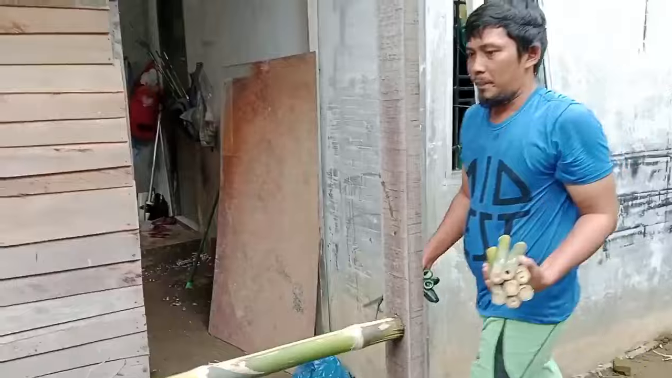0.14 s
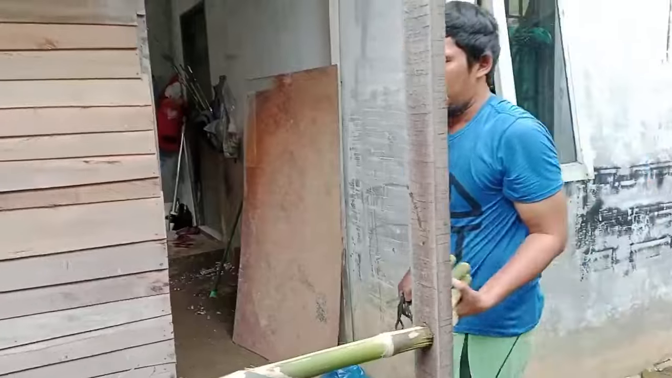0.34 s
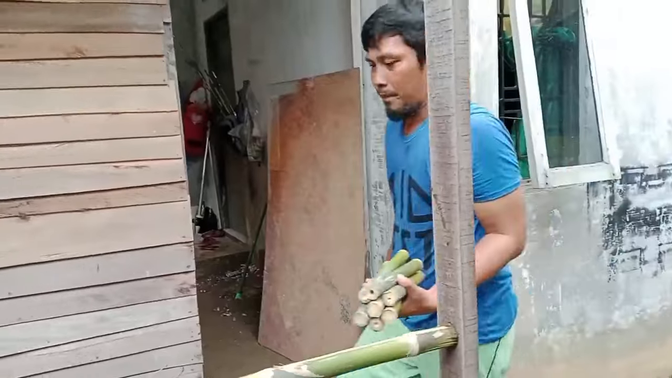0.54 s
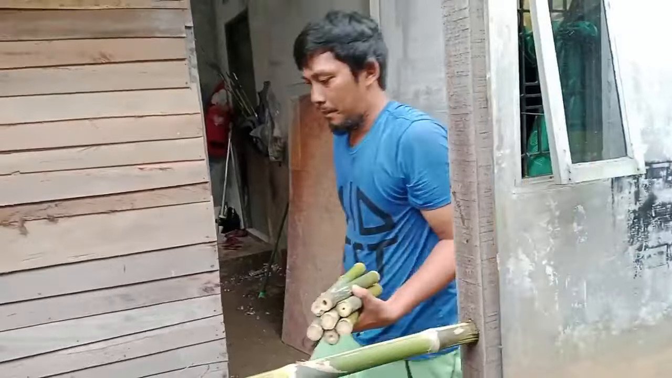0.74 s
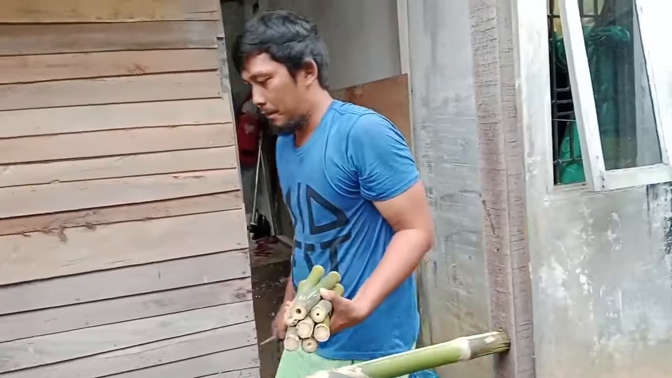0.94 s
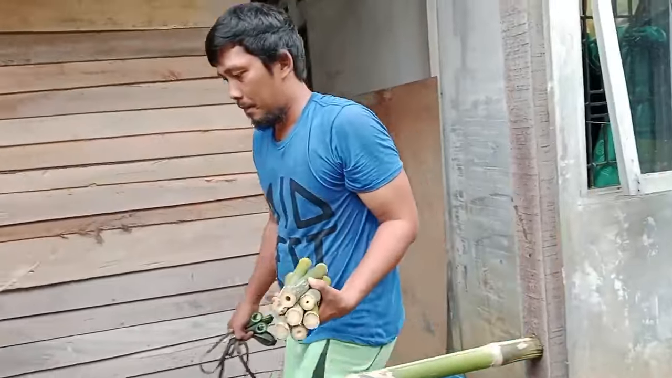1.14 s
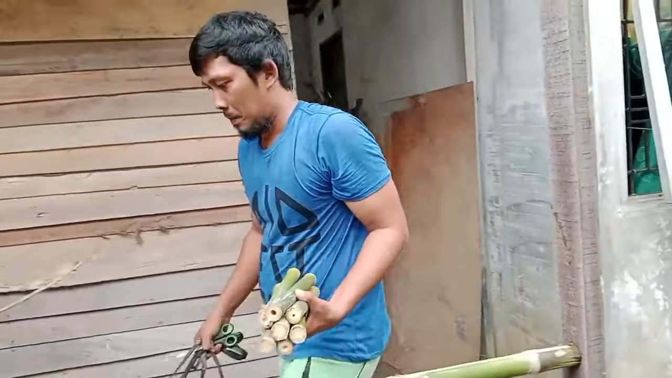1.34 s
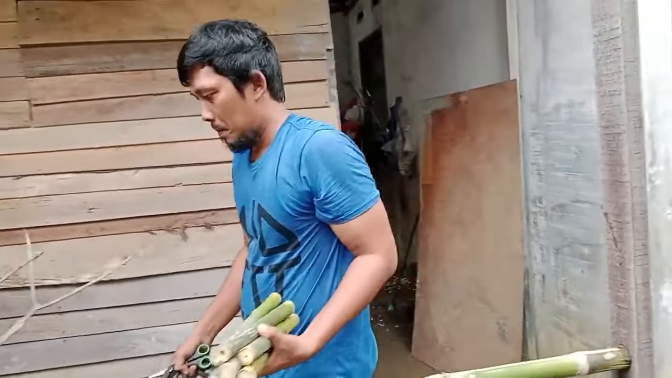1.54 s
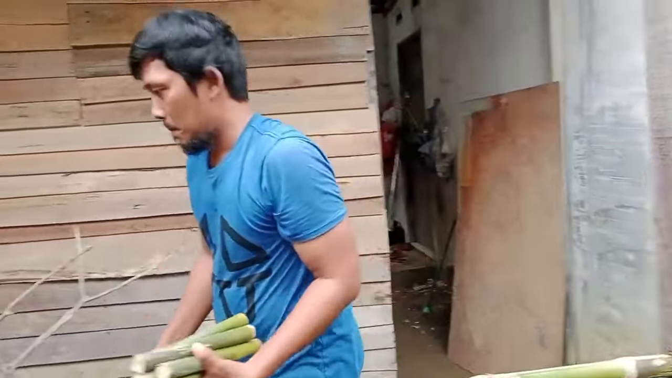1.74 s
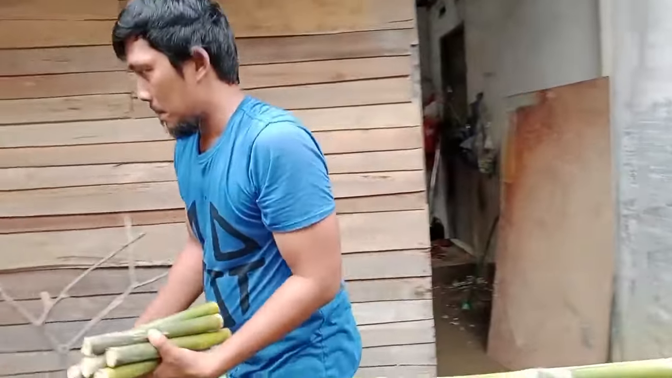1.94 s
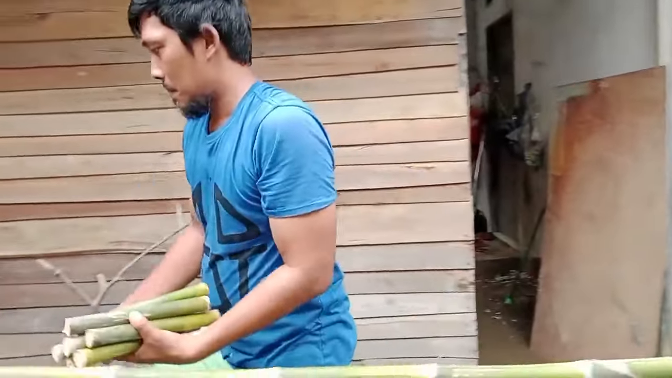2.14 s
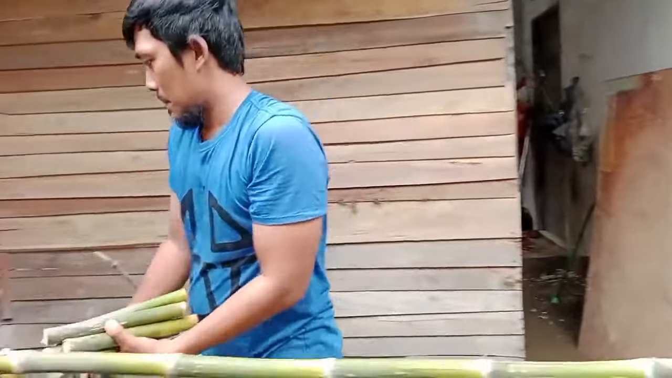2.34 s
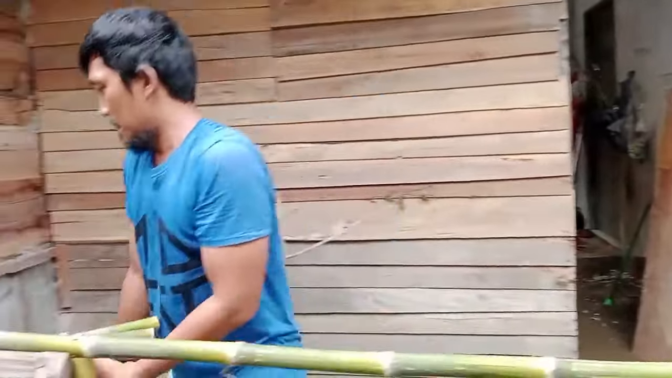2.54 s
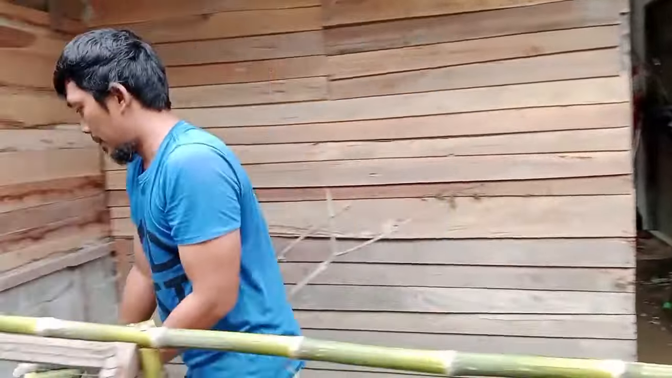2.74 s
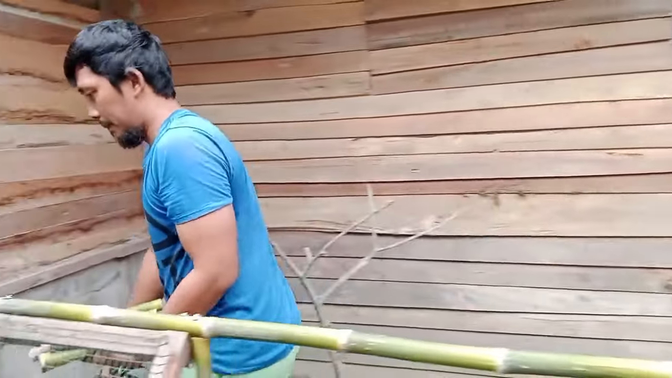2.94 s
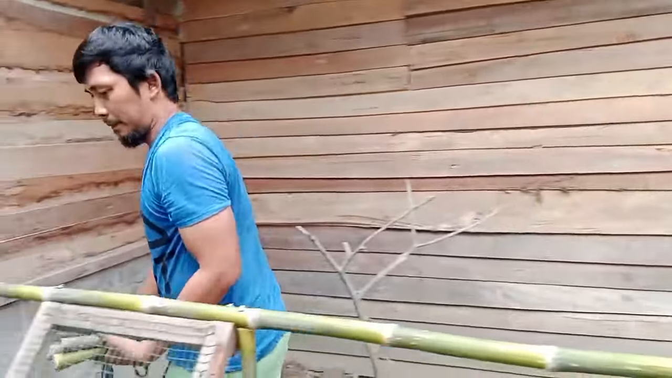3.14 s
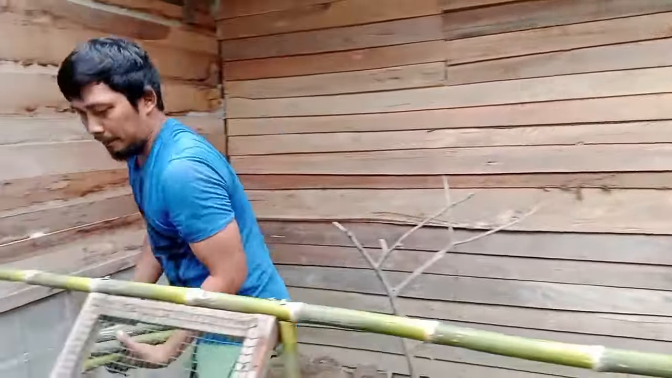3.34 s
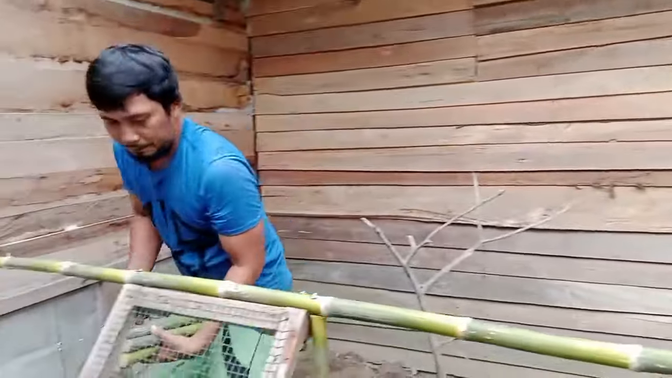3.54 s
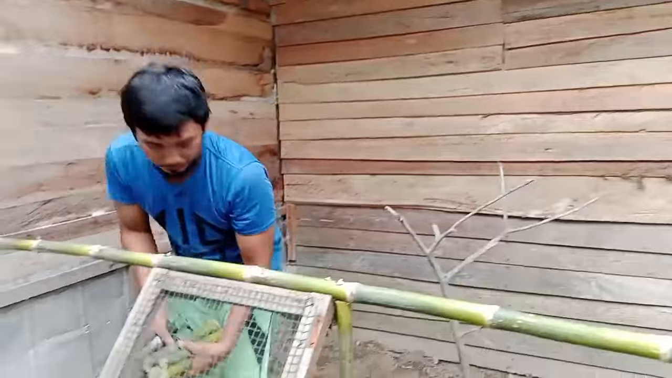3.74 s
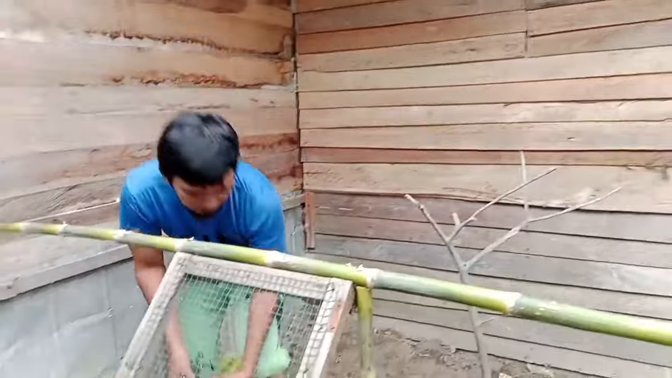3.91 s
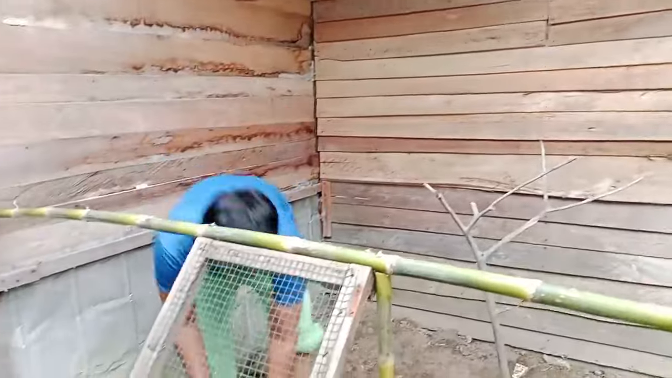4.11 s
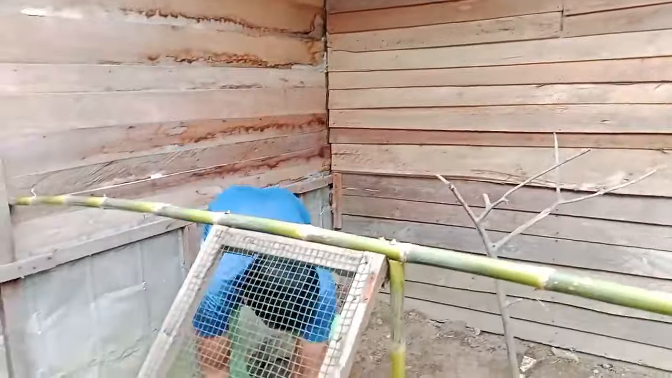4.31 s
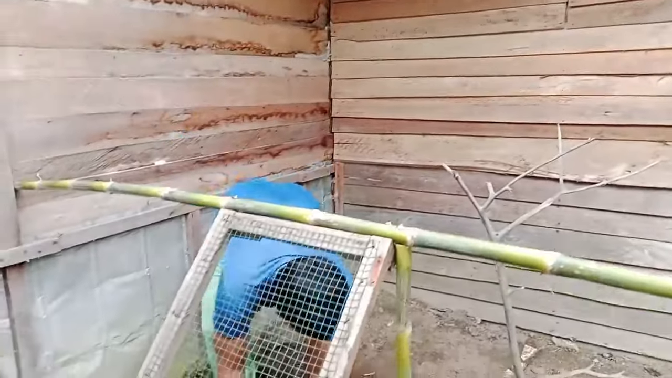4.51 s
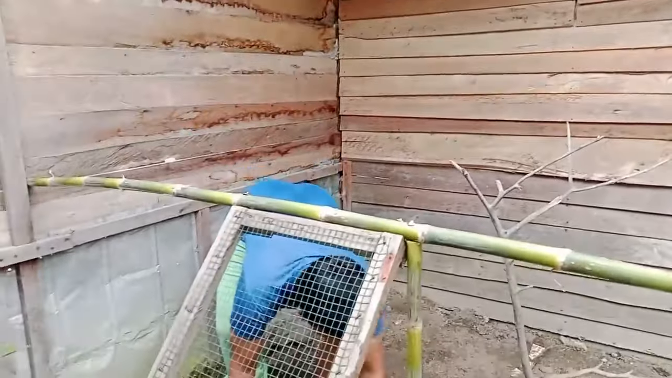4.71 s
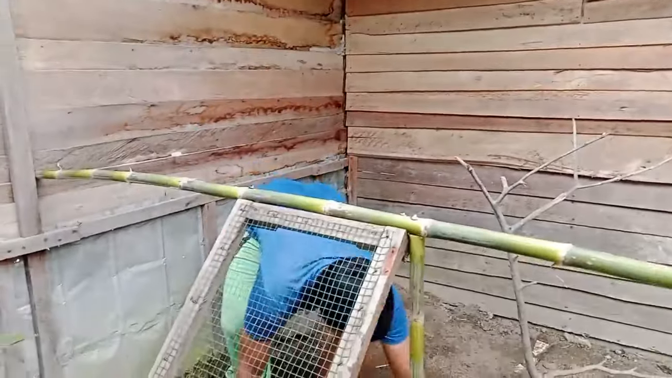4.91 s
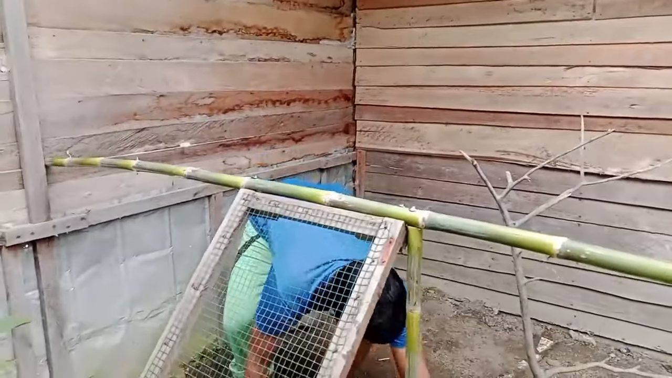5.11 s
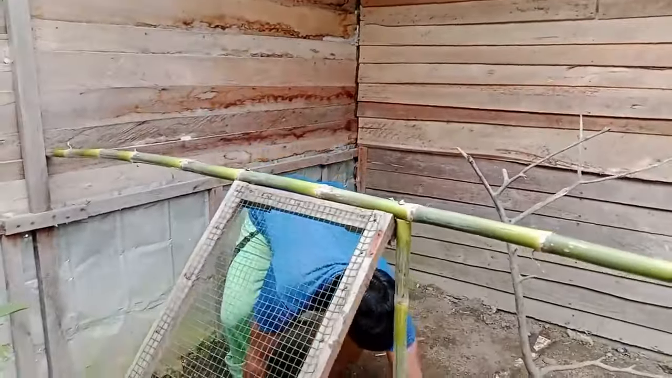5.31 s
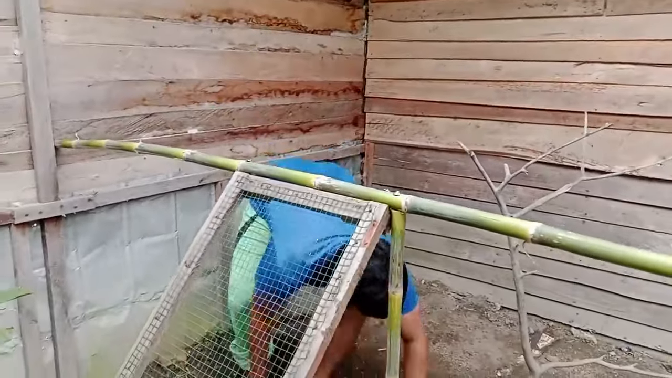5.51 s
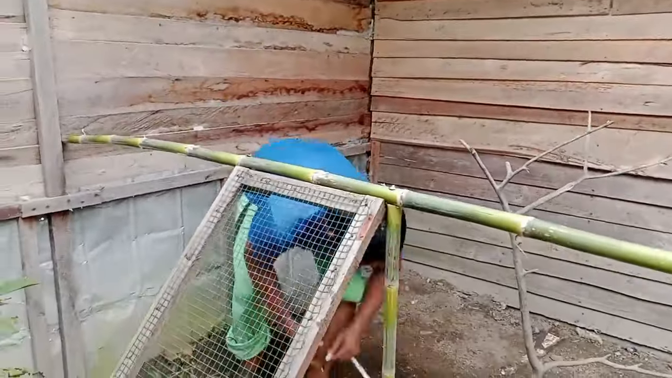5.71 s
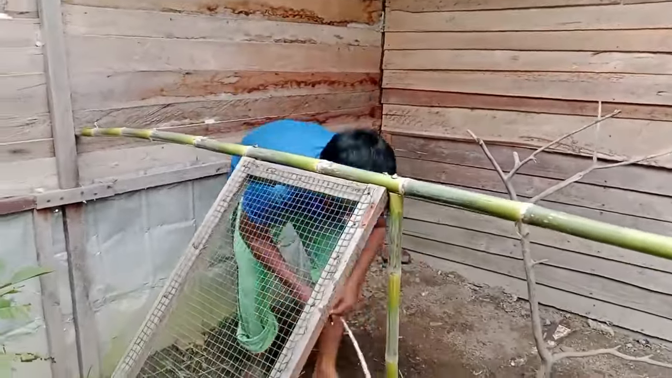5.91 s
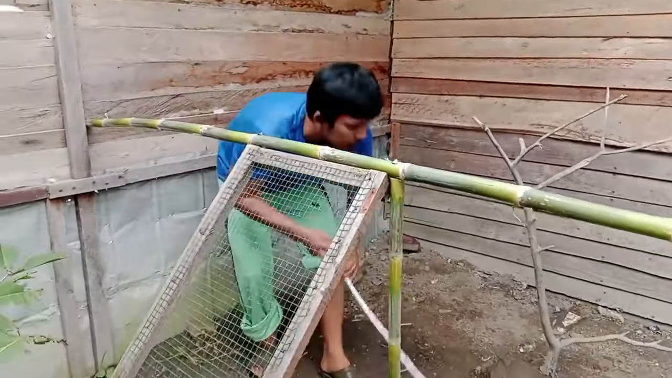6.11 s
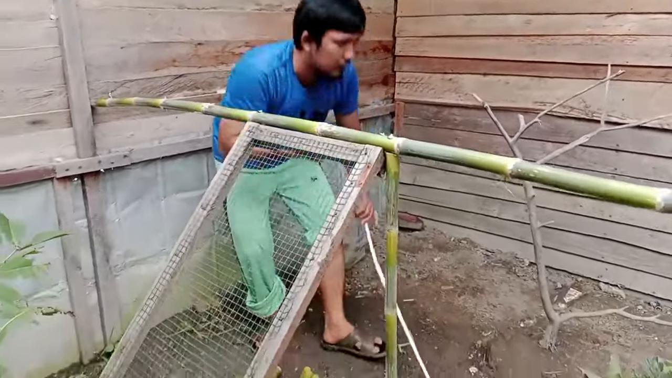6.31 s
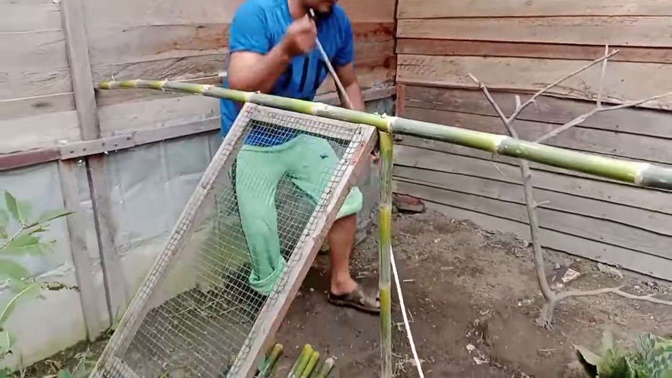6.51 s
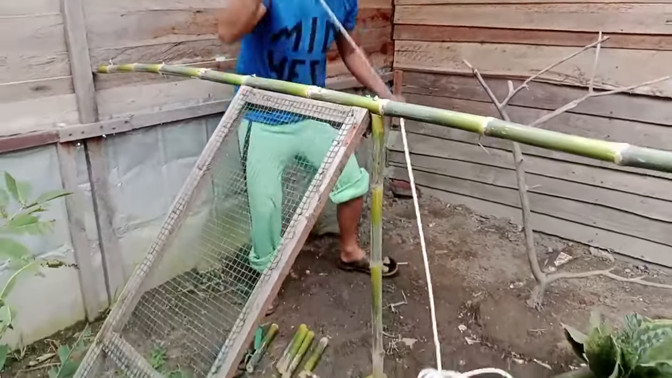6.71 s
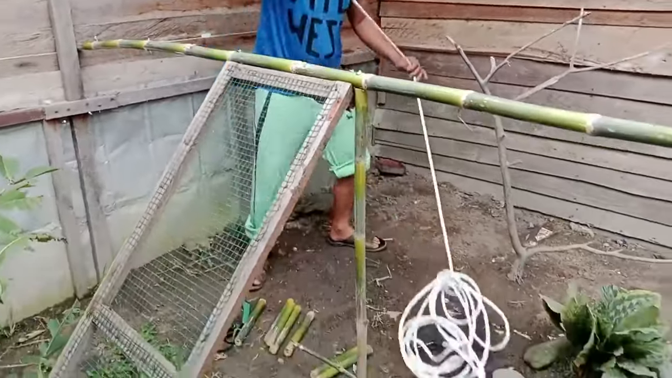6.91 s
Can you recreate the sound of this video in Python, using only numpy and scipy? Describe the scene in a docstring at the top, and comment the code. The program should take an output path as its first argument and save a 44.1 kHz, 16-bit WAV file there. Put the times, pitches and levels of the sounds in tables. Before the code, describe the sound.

Soft footsteps on gritty earth, then a bundle of bamboo sticks drops with a loud hollow clatter, followed by small knocks, scraping and rustling outdoors.

```python
"""A plank-walled yard: a man in sandals carries a bundle of short bamboo sticks across and drops it on the earth.
Knocks ring the bamboo modes and rubbing slips keep them sounding; bursts of grains crunch over fading thuds.
Feet, clothes and rope drag as swelling grainy noise, with fine dry ticks late on.
Insects and a far motor are narrow noise bands over a quiet outdoor floor; the walls return dull echoes."""
import sys
import numpy as np
from scipy import signal
from scipy.fft import rfft, irfft
from scipy.io import wavfile
from scipy.ndimage import uniform_filter1d, minimum_filter1d

SR = 44100
rng = np.random.default_rng(int(sys.argv[2]) if len(sys.argv) > 2 else 0)


def to_wav(sig):
    """Store sig (one row per channel, or 1-D mono) as 16-bit WAV at the path in sys.argv[1].

    Samples outside -1..1 are clipped; the rate is SR.
    """
    pcm = np.clip(np.atleast_2d(sig), -1, 1) * 32767
    pcm = np.round(pcm).astype(np.int16)
    wavfile.write(sys.argv[1], SR, pcm.T)  # frames by channels


N = 306568
T = np.arange(N) / SR
DECAY = np.log(1000)  # a fall of 60 dB

# modes of the freely ringing sticks: (frequency [Hz], level [dB], t60 [s])
BAMBOO = [(900, -18.5, 0.029), (1220, -12, 0.11), (1350, -5, 0.069), (1340, -10, 0.15), (1489, 0.5, 0.053),
          (1566, 0, .12), (1597.6, -1.5, 0.11), (1710, -9, 0.056), (1748, -2, 0.11), (1850, -2, 0.045),
          (1854, -2, 0.084), (2177, -19, 0.071), (2240, -12, 0.07), (2470, -17, 0.085), (2710, -8, 0.12),
          (3135, -9, 0.027), (3110, 2.5, 0.051), (2900, -5.5, 0.09), (3235, -6.5, 0.11),
          (3220, -8.5, 0.051), (3580, -6.5, 0.021), (6800, -23, 0.024), (6550, -25.5, 0.078)]
OVERTONES_FROM_HZ = 2000  # bamboo modes below are main tones, the others overtones


def amp(db):
    """Gain of a level in dB."""
    return 10 ** (np.asarray(db) / 20)


def unit(x):
    """Scale to rms 1."""
    return x / np.sqrt(np.mean(x ** 2))


def colour(x, points):
    """Shape the spectrum by (frequency [Hz], level [dB]) points, joined over log frequency; rms 1."""
    hz, db = np.transpose(points)
    f = np.maximum(np.fft.rfftfreq(len(x), 1 / SR), 1)
    curve_db = np.interp(np.log(f), np.log(hz), db)
    return unit(irfft(rfft(x) * amp(curve_db), len(x)))


def grains(spread_db, keep):
    """Noise of sparse uneven clicks: a share of the samples sound, with exponential levels in dB."""
    sounding = rng.random(N) < keep
    return rng.standard_normal(N) * sounding * amp(spread_db * rng.exponential(size=N))


def walk(rate):
    """Wandering random levels: held 1 / rate s and slewed twice; spread near 1."""
    k = int(SR / rate)
    held = np.repeat(rng.standard_normal(N // k + 1), k)
    return 0.68 * uniform_filter1d(uniform_filter1d(held, k), k)[:N]


def add(track, s, sound):
    """Mix a sound into a track at s seconds."""
    i = int(s * SR)
    track[i:i + len(sound)] += sound[:N - i]


def tone(hz, width_hz):
    """A narrow wavering band of noise; rms 1."""
    edges = [hz - width_hz / 2, hz + width_hz / 2]
    band = signal.butter(2, edges, "band", fs=SR, output="sos")
    return unit(signal.sosfilt(band, rng.standard_normal(N)))


def patchy(x, depth_db, bins=3, frames=5):
    """Loose debris rings now here, now there: narrow short-lived resonances at random pitches."""
    z = signal.stft(x, nperseg=1024)[2]
    field = uniform_filter1d(rng.standard_normal(z.shape), bins, axis=0)
    field = uniform_filter1d(field, frames, axis=1)
    return unit(signal.istft(z * amp(depth_db * unit(field)))[1][:N])


def halves(x):
    """Dull and bright part of a sound, split at 1500 Hz, each rms 1."""
    filters = [signal.butter(3, 1500, kind, fs=SR, output="sos") for kind in ("low", "high")]
    return [unit(signal.sosfilt(sos, x)) for sos in filters]


def blow(t, rise_ms, t60):
    """Envelope of a contact: smooth rise, then decay; top near 1."""
    push = np.sin(np.pi / 2 * np.clip(1000 * t / max(rise_ms, .1), 0, 1)) ** 2
    return push * np.exp(-DECAY * np.maximum(t - rise_ms / 1000, 0) / t60)


def swell(s, rise, hold, fall):
    """Envelope of a stroke: fades in up to s, holds, fades out, by 20 dB per rise or fall time."""
    outside = np.maximum((s - T) / rise, (T - s - hold) / fall)
    return amp(-20 * np.maximum(0, outside))


def nearness(hz, pitch_hz, reach_hz, shared_db):
    """Share of each mode: the one nearest the pitch leads, and the whole bundle shakes along a little."""
    far = ((hz - pitch_hz) / reach_hz) ** 2
    return np.exp(-.5 * (far - far.min(axis=0))) + amp(shared_db)


def yard():
    """Insects as trilled narrow noise, a far motor as surging low noise, and the shaped outdoor floor."""
    # insect phrases, each swelling by 10 dB and breaking off: (start [s], end [s], end level [dB])
    insect_phrases = [(0, 0.49, -68), (0.663, 1.58, -69.5), (2.006, 2.717, -66.5), (2.9, 3.823, -65),
                      (4.056, 4.894, -66.5), (5.251, 6.043, -65), (6.15, 6.964, -65.5)]
    # surges of the far motor: (time [s], hold [s], level [dB])
    motor_surges = [(4.796, 0.19, -68), (5.209, .03, -70.5), (5.55, 0.251, -65), (6.099, 0.37, -58),
                    (6.869, 0.094, -58)]
    # spectrum of the floor: (frequency [Hz], relative level [dB])
    floor_shape = [(26, -32), (45, -6), (53, -7.5), (99, 2), (178, 2), (306, -7.5), (1480, -18.5),
                   (5170, -26.5), (7290, -25), (8870, -13.5), (9550, -16), (14900, -20), (16000, -25.5)]
    trill = 1 + 0.14 * np.sin(2 * np.pi * 85 * T)
    phrases = sum(amp(np.interp(T, [start, end], [db - 10, db], -120, -120))
                  for start, end, db in insect_phrases)
    insects = tone(8900, 260) * trill * uniform_filter1d(phrases, SR // 20)
    rise_s, fall_s = 0.105, 0.11
    surges = sum(amp(db) * swell(s, rise_s, hold, fall_s) for s, hold, db in motor_surges)
    motor = tone(82, 16) * surges
    air = patchy(colour(rng.standard_normal(N), floor_shape), 3.5) * amp(walk(3) - 69)
    return insects + motor + air


def drag():
    """Feet, clothes and rope: grainy scraping, dull or bright, with a fine rustle above it."""
    # dragging strokes: (time [s], rise [s], hold [s], fall [s],
    #                    dull scrape level [dB], bright scrape level [dB], rustle level [dB])
    strokes = [(0.0, .01, 0.077, .1, -95, -62, -61), (0.428, 0.071, 0.0091, 0.071, -89, -69.5, -65),
               (0.52, 0.027, 0.15, 0.087, -95, -66.5, -61), (4.196, 0.24, .02, .02, -80.5, -70.5, -60),
               (4.417, 0.0086, 0.0093, 0.14, -88, -54, -52.5), (4.56, 0.12, 0.039, 0.25, -79, -64.5, -61),
               (4.757, 0.11, .01, .12, -63.5, -57, -65.5), (4.967, 0.11, 0.017, 0.12, -56, -54, -55.5),
               (5.092, 0.048, 0.011, 0.28, -52.5, -45, -65.5), (5.302, 0.18, 0.045, 0.19, -54, -56, -53.5),
               (5.714, 0.061, 0.009, 0.073, -95, -76.5, -66.5), (5.86, .06, 0.086, 0.161, -81, -82, -67),
               (6.048, 0.15, 0.3, 0.19, -53, -63.5, -57.5), (6.501, 0.12, 0.18, 0.17, -72.5, -59, -59),
               (6.839, 0.13, .1, .1, -66.5, -64, -58.5)]
    # spectrum of the scrape: (frequency [Hz], relative level [dB])
    scrape_shape = [(210, -53), (350, -19.5), (478, -18.5), (584, -2.5), (771, -3), (974, 2), (1050, -1.5),
                    (2680, -7.5), (3870, -14), (5000, -39.5), (6500, -53), (11000, -120)]
    # spectrum of the rustle: (frequency [Hz], relative level [dB])
    rustle_shape = [(2650, -44.5), (4500, -24.5), (5000, -25), (6300, -10), (7200, -3.5), (9300, -6),
                    (10300, 0), (12500, -3), (13800, -8), (16000, -7.5)]
    scrape = patchy(colour(grains(1.5, .3), scrape_shape), 4.5, frames=8) * amp(1.5 * walk(25))
    low, high = halves(scrape)
    rustle = patchy(colour(grains(1.5, 0.37), rustle_shape), 1.7) * amp(1.3 * walk(27))
    out = np.zeros(N)
    for s, rise, hold, fall, dull_db, bright_db, rustle_db in strokes:
        blend = low * amp(dull_db) + high * amp(bright_db) + rustle * amp(rustle_db)
        out += swell(s, rise, hold, fall) * blend
    return out


def sticks(reach_hz=18, shared_db=-24, crack_t60_s=0.06, scatter_db=2):
    """Each knock rings the modes near the struck stick's pitch most, the overtones at a level given for each knock."""
    # sticks knocking: (time [s], level [dB], pitch of the struck stick [Hz],
    #                   overtones [dB, before doubling], crack [dB re knock, before the mix gain])
    knocks = [(0.079, -54.5, 1960, 1.5, -14), (0.679, -49, 1470, -11, -21.5),
              (0.718, -45.5, 1210, -12, -16), (2.014, -60, 1651, -15, -40), (3.4304, -53.5, 1530, 4, -4),
              (3.5898, -46.5, 1580, -3.5, -22.5), (3.845, -54, 1500, -3, -7), (3.9513, -49, 1667, 1, -23.5),
              (4.2159, -8.5, 1703, -24, -28.5), (4.2235, -10, 1490, -19, -27.5),
              (4.2349, 0, 1820, -9, -35.5), (4.2381, 5.5, 1718, -6.5, -23), (4.258, 5.5, 1642, -38, -18),
              (4.2621, 1, 1720, -4.5, -33), (4.2697, 1.5, 1590, -21, -29), (4.2843, -0.5, 1615, -20, -27),
              (4.2916, -4.5, 1647, -13.5, -37.5), (4.309, -12.5, 1531, -12.5, -22.5),
              (4.3176, -21, 1550, -9.5, -25), (4.3439, -19, 1722, -10.5, -24),
              (4.365, -25.5, 1550, -9.5, -22), (4.3853, -26.5, 1620, -13, -24),
              (4.42, -18.5, 1727, -19, -33), (4.5405, -35, 1784, -15, -22), (4.5504, -36.5, 1750, -22, -27),
              (4.6676, -41.5, 1652, -7, -13.5), (4.752, -43, 1470, -14, -14),
              (4.7797, -42, 1520, -20.5, -23.5), (4.9041, -46.5, 1670, -5, -7.5),
              (5.062, -37, 1635, -10, -12), (5.0956, -18, 1564, -12, -31), (5.1069, -14, 1587, -22, -46),
              (5.134, -29.5, 1576, -17, -48.5), (5.163, -17.5, 1589, -21, -40), (5.165, -37, 1890, 1.5, 6),
              (5.232, -34, 1576, -4.5, -11.5)]
    # spectrum of the crack: (frequency [Hz], relative level [dB])
    crack_shape = [(2650, -35), (4500, -7), (5900, -12), (6740, -0.5), (9160, -13.5), (10400, -9.5),
                   (13400, -22), (14900, -18.5), (16000, -18.5)]
    shortest_ms, soft_db = 2.5, -29.5  # shortest contact, and the crack level below which it grows
    hz, db, t60 = np.transpose(BAMBOO)[:, :, None]
    low = hz < OVERTONES_FROM_HZ
    t, out, crack = T[:SR // 4], np.zeros(N), np.zeros(N)
    chance = rng.standard_normal((len(knocks), len(BAMBOO), 1))
    for (s, level_db, pitch_hz, over_db, crack_db), size in zip(knocks, chance):
        # hard blows press the stick into the earth and shorten its ring
        ring = np.interp(level_db, [-19.5, 0], [1, 0.7])
        # a softer contact lasts longer and cracks less
        contact_ms = shortest_ms * amp(max(0, soft_db - crack_db))
        near = nearness(hz, pitch_hz, reach_hz, shared_db)
        # a hollow stick favours the overtone near twice its pitch
        octave = nearness(hz, 1.8 * pitch_hz, 154, -4.5)
        gain = amp(db + scatter_db * size) * np.where(low, near, octave)
        # main tones share a sum of 1, overtones their own level
        gain = gain * np.where(low, 1 / gain[low].sum(), 2 * amp(over_db) / gain[~low].sum())
        modes = gain * np.sin(2 * np.pi * hz * t) * blow(t, contact_ms, t60 * ring)
        add(out, s, amp(level_db) * modes.sum(axis=0))
        add(crack, s, amp(level_db + crack_db) * blow(t, 0.36 * contact_ms, crack_t60_s))
    return out + 0.51 * crack * colour(rng.standard_normal(N), crack_shape)


def walls(x):
    """Dense dying echoes between the plank walls, duller than the direct sound."""
    t, echo_t60_s = T[:SR // 2], 0.2
    tail = rng.standard_normal(len(t)) * np.exp(-DECAY * t / echo_t60_s) * (t > .004)
    tail = signal.lfilter(*signal.butter(1, 3520, fs=SR), tail)
    tail = tail / np.sqrt(np.sum(tail ** 2))
    return amp(-20.5) * signal.fftconvolve(x, tail)[:N]


def steps(grit_long=1.71):
    """Dying bursts of grains: soles and the landing bundle crush soil and grit, and a late stick knock adds grit."""
    # bursts of crunch and grit: footfalls, the bundle landing and a late stick knock, before the mix gains:
    # (time [s], crunch [dB], brightness [dB re crunch], grit [dB re crunch], crunch t60 [s])
    bursts = [(0.502, -71, 13.5, 21.5, 0.34), (1.25, -48.5, 13, 7, 0.26), (1.28, -50, -2, -1.5, 0.19),
              (1.337, -62.5, 10.5, 8.5, 0.395), (1.361, -50, 18, -14, 0.028), (1.3693, -51, 16, -14, 0.015),
              (1.37, -57.5, 14.5, -16, 0.37), (1.806, -48.5, 6.5, -5.5, 0.589), (1.855, -49, -2, -9, 0.31),
              (1.911, -44, 1, -18, 0.22), (2.172, -46, -5, -21, 0.35), (2.19, -40, -9, -22, 0.27),
              (2.207, -30, -8, -19.5, 0.27), (2.301, -59.5, 12, 5, 0.094),
              (2.888, -38.5, -6.5, -11.5, 0.36), (2.927, -63, 16, -4, 0.55),
              (3.461, -25.5, -3, -24.5, 0.26), (3.502, -45.5, -2.5, -41, 0.36),
              (3.595, -60.5, -10, -1, 0.93), (3.828, -61.5, 12, 7, 0.15), (4.233, -12, 8, -21, 0.32),
              (4.257, -21.5, 18.5, -13, 0.13), (4.379, -36.5, -18, -21, 0.25),
              (4.693, -51, 10.5, -0.5, 0.29), (4.95, -41, -7, -16, 0.61), (5.163, -43.5, 11, 5, 0.12),
              (5.242, -41.5, -5, -16, 0.493)]
    # spectrum of the crunch: (frequency [Hz], relative level [dB])
    crunch_shape = [(350, -39), (600, -9.5), (723, -8.5), (919, -7), (1130, -6), (2310, -5.5), (3630, -15),
                    (5000, -37.5), (6500, -71), (11000, -120)]
    # spectrum of the grit: (frequency [Hz], relative level [dB])
    grit_shape = [(2650, -42.5), (4500, -24), (4870, -28.5), (5650, -9.5), (6320, -10.5), (6990, -2.5),
                  (8740, -3.5), (9410, -8.5), (10300, 3.5), (12800, -10), (14000, -9), (14900, -7.5),
                  (16000, -9.5)]
    rise_ms = 0.95
    t, (dull, bright, grit) = T[:SR], np.zeros((3, N))
    for s, db, bright_db, grit_db, t60 in bursts:
        add(dull, s, amp(db) * blow(t, rise_ms, t60))
        add(bright, s, amp(db + bright_db) * blow(t, rise_ms, t60))
        add(grit, s, amp(db + grit_db) * blow(t, rise_ms, grit_long * t60))
    low, high = halves(patchy(colour(grains(2.0, .2), crunch_shape), 4, frames=9))
    body = amp(-7) * tone(352, 303)  # hollow body of a footfall
    crunch = 0.28 * amp(4.2 * walk(70)) * (dull * (body + low) + bright * high)
    grit_noise = patchy(colour(grains(2.0, 0.14), grit_shape), 1.7)
    return crunch + 0.53 * grit * amp(2.3 * walk(130)) * grit_noise


def thuds(boom_db=-17):
    """Each thud is a fading tone, mostly low, with a boom under it."""
    # thuds: (time [s], level before wavering [dB], frequency [Hz], t60 [s])
    impacts = [(0.512, -54, 162, 0.14), (1.253, -49, 895, 0.12), (1.264, -58, 147, 0.087),
               (1.831, -57, 317, 0.103), (1.916, -57.5, 327, 0.22), (2.164, -40.5, 186, 0.209),
               (2.166, -46, 342, 0.11), (2.211, -40, 239, 0.099), (2.215, -43.5, 133, 0.13),
               (2.26, -50, 306, 0.5), (2.36, -54.5, 321, 0.3), (2.905, -46, 306, 0.11),
               (2.914, -37.5, 162.3, 0.25), (2.975, -45, 188, 0.06), (3.466, -34.5, 163.2, 0.3),
               (3.518, -40, 157.4, 0.15), (3.6, -49.5, 179, 0.079), (4.236, -19.5, 279.6, 0.097),
               (4.3, -34.5, 141.4, 0.34), (4.378, -37, 172, 0.15), (4.445, -48.5, 143.5, 0.47),
               (4.648, -48.5, 152.6, 0.065), (4.884, -44, 212, 0.11), (4.956, -48.5, 336, 0.21),
               (5.08, -53.5, 308.3, 0.13), (5.272, -52.5, 316, 0.13), (5.488, -59, 184, 0.1325),
               (6.775, -54, 334.5, 0.19)]
    rise_ms = 12
    t, tones, boom = T[:SR // 2], np.zeros(N), np.zeros(N)
    for s, db, hz, t60 in impacts:
        envelope = blow(t, rise_ms, t60)
        add(tones, s, amp(db) * envelope * np.sin(2 * np.pi * hz * t))
        add(boom, s, amp(db + boom_db) * envelope)
    boom_noise = tone(120, 100)
    return tones * amp(4.9 * walk(60)) + boom * boom_noise


def rubbing(reach_hz=70, over_reach_hz=200):
    """Dense tiny slips between the sticks keep the modes near the rubbed spot ringing softly."""
    # sticks rubbing in the bundle: (time [s], rise [s], fall [s], level [dB], pitch [Hz],
    #                                overtones [dB re level], overtone pitch [Hz])
    rubs = [(0.52, 0.048, .15, -66.5, 1510, 0.5, 2330), (0.6, 0.063, 0.088, -65, 1440, -10, 2630),
            (0.72, 0.031, 0.058, -55.5, 1260, -10, 2390), (2.03, 0.029, 0.062, -62.5, 1670, -0.5, 3130),
            (3.62, .01, 0.023, -60, 1610, -1, 2550), (3.706, 0.0082, 0.14, -68, 1640, 6.5, 3340),
            (3.858, 0.1, 0.061, -60.5, 1530, -9, 2400), (3.96, 0.0089, 0.12, -52.5, 1627, -10, 2945),
            (4.082, 0.016, 0.208, -59.5, 1640, -4, 3323), (4.205, 0.052, 0.03, -51, 1640, -4, 3370),
            (4.47, 0.024, 0.18, -50, 1680, -9.5, 3300), (4.56, 0.226, 0.08, -51.5, 1725, -15, 3120),
            (4.666, 0.0081, 0.14, -48, 1622, -7.5, 3110), (4.768, 0.042, 0.11, -52, 1600, -15, 3040),
            (4.984, 0.08, 0.143, -60, 1530, 5, 2660)]
    hz, db, t60 = np.transpose(BAMBOO)
    low = hz < OVERTONES_FROM_HZ
    slips = grains(2, .2) * amp(2 * walk(40))
    damping = .5  # hands on the bundle shorten the ring
    pole = np.exp(2j * np.pi * hz / SR - DECAY / (damping * t60 * SR))
    # soft contact: doubled poles give the resonances steep skirts
    rings = np.array([unit(signal.lfilter([1], [1, -2 * p, p * p], slips).imag) for p in pole])
    out = np.zeros(N)
    for s, rise, fall, level_db, pitch_hz, over_db, over_hz in rubs:
        gain = np.zeros(len(hz))
        groups = ((low, pitch_hz, reach_hz, level_db),
                  (~low, over_hz, over_reach_hz, level_db + over_db))
        for group, centre, reach, group_db in groups:
            share = amp(.5 * db[group]) * nearness(hz[group], centre, reach, -19.0)
            gain[group] = amp(group_db) * share / np.sqrt((share ** 2).sum())
        out += swell(s, rise, 0, fall) * (gain @ rings)
    return out


def ticks():
    """Pulling the rope gives very short clicks: high-passed noise in brief decaying bursts."""
    # fine dry ticks: (time [s], level [dB])
    rope_ticks = [(5.675, -62.5), (5.836, -53), (5.881, -52.5), (5.945, -58), (5.98, -48), (6.03, -54),
                  (6.36, -58), (6.487, -56)]
    t, env = T[:SR // 20], np.zeros(N)
    for s, db in rope_ticks:
        add(env, s, amp(db) * blow(t, 0.56, 0.016))
    treble = signal.butter(4, 10500, "high", fs=SR, output="sos")
    return env * unit(signal.sosfilt(treble, rng.standard_normal(N)))


def scene():
    """All sources in the yard; only the knocks and the crunch and grit bursts echo from the walls."""
    near = sticks() + steps()
    return (yard() + drag() + near + walls(near) + thuds() + rubbing() + ticks())[None]


def record(dry):
    """A fast limiter holds the loudest peaks, then a steep low-pass cuts the top."""
    ceiling, top_hz = .76, 15650
    hold = SR // 700
    gain = np.minimum(1, ceiling / (np.abs(dry) + 1e-9))
    gain = uniform_filter1d(minimum_filter1d(gain, 2 * hold), hold)
    return signal.sosfilt(signal.ellip(10, .2, 70, top_hz, fs=SR, output="sos"), dry * gain)


dry = scene()
out = record(dry)
to_wav(out)
```